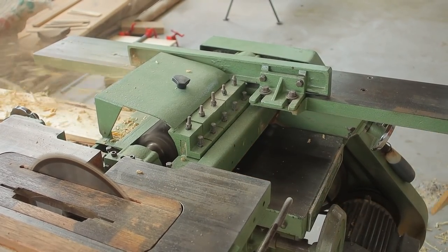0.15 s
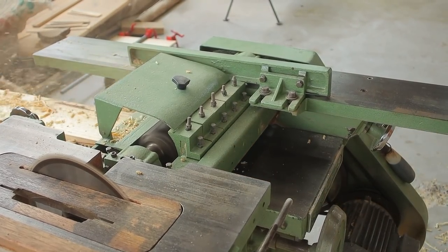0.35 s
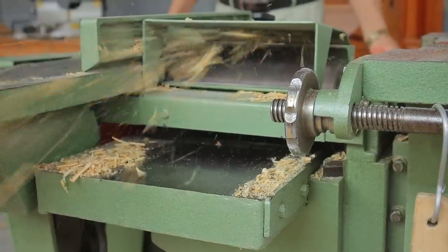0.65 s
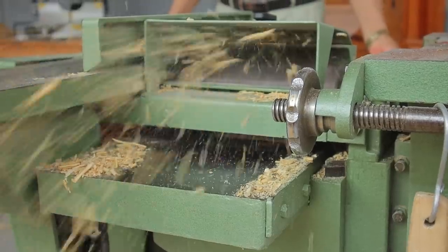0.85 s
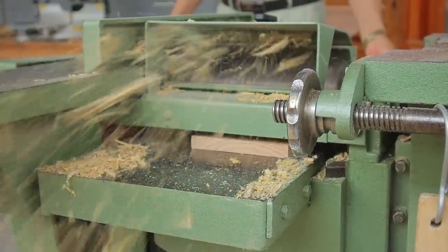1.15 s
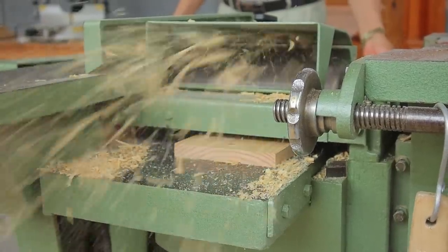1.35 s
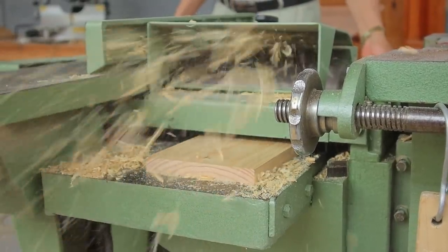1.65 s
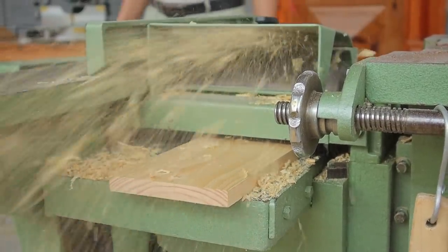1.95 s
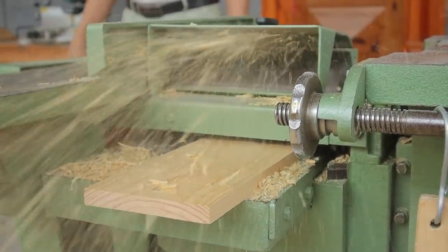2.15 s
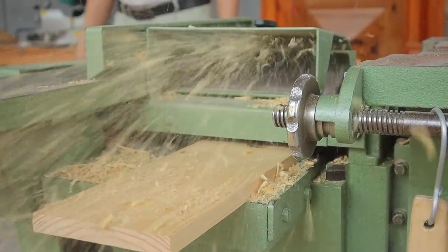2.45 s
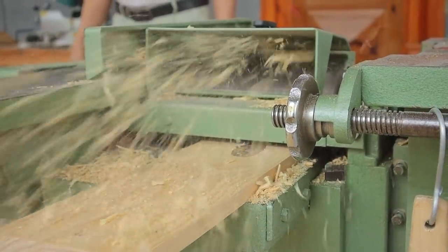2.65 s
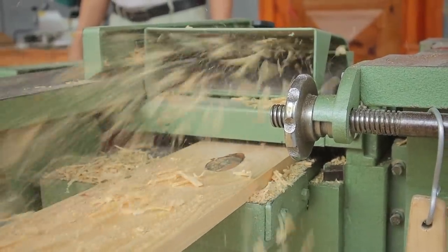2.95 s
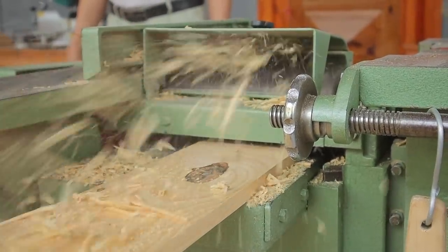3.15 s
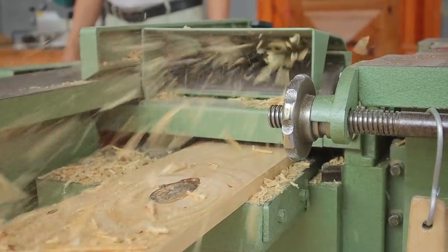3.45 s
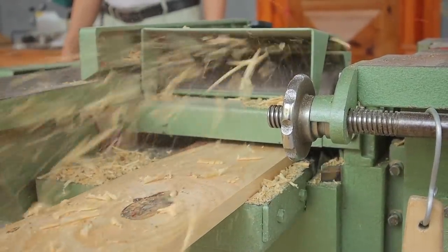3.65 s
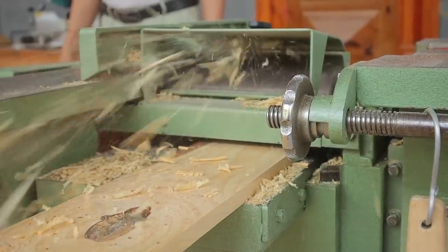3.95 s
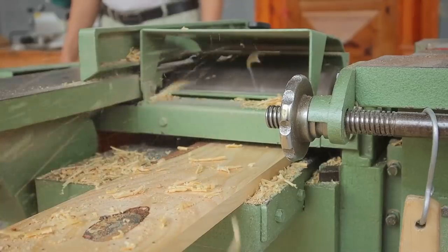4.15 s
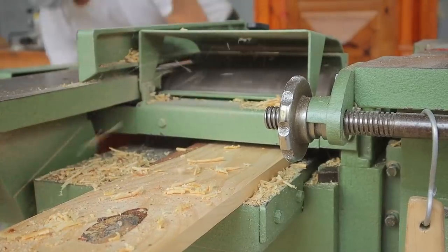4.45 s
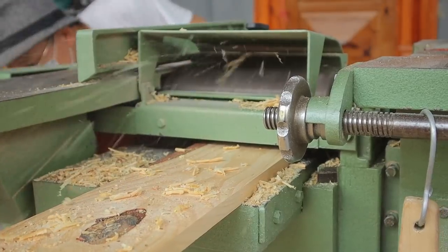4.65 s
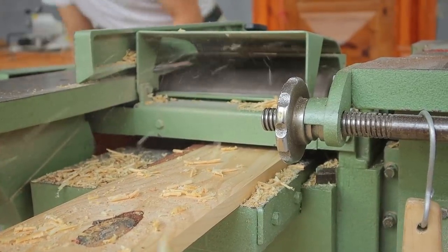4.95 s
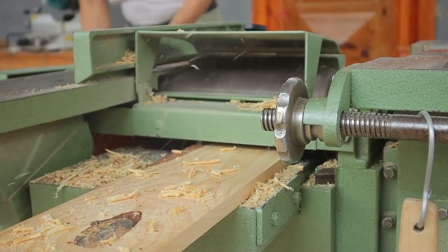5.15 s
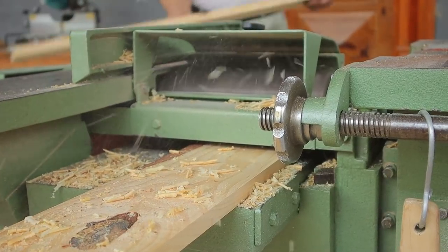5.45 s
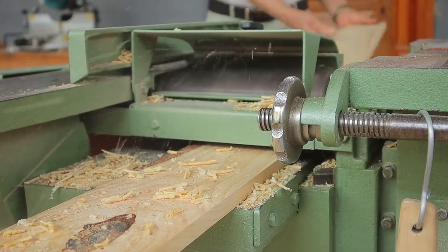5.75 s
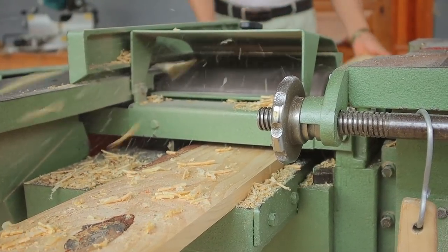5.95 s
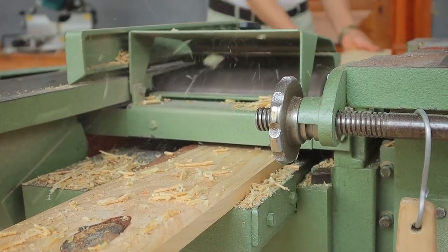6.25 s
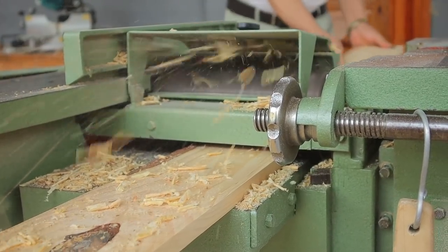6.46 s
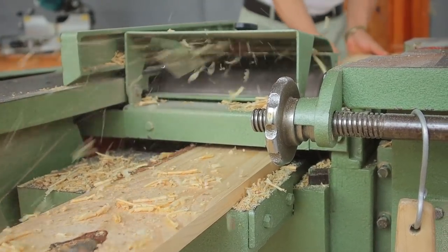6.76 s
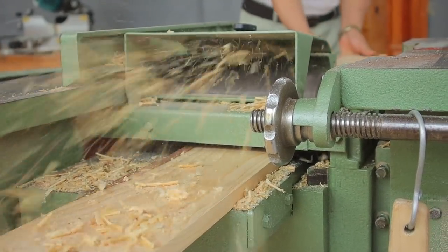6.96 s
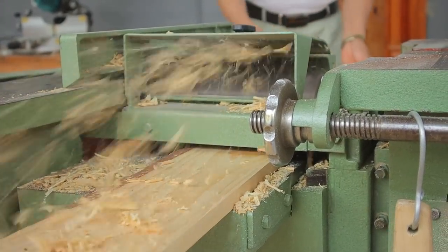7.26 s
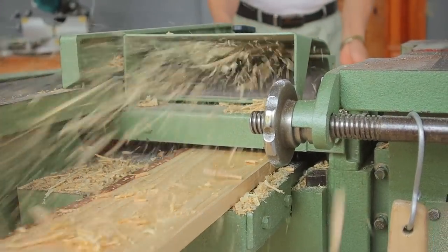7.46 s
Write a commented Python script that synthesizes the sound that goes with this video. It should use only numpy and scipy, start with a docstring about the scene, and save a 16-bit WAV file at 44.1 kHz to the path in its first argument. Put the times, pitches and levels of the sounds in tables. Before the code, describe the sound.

Close in a woodworking shop, a planer's spinning knife block whines thinly, drops out for an instant, then returns nearer, idling briefly. A board bites in with a harsh, loud, ringing buzz, crackling splinters and chips ticking on the metal hood. The board stalls and the sound settles into a steadier metallic drone, until sharp knocks announce another board and the rough tearing resumes to the end.

```python
"""A planer's two-knife cutter block, heard close by in a woodworking shop: first skimming a board at the
top table, then, from the outfeed, idling briefly and biting into a board fed through underneath. That board
stalls, its tail brushing the knives, until a second board pushes it on. Each knife stroke is a ringing knock
and a burst of tearing fibre; splinters crack, boards bump, the block hums and rushes, chips tick in the hood
and patter around. The speed curve sets every stroke; its sag under load also steers hiss, hum and chips."""
import sys
import numpy as np
from scipy import signal
from scipy.fft import rfft, irfft, next_fast_len
from scipy.io import wavfile
from scipy.ndimage import uniform_filter1d, map_coordinates

SR = 44100
rng = np.random.default_rng(int(sys.argv[2]) if len(sys.argv) > 2 else 0)


def dump_mix(stems):
    """Bounce the given channels to the path in sys.argv[1] as a 16-bit WAV at rate SR."""
    frames = np.atleast_2d(stems).T  # one column per channel
    limited = np.clip(frames, -1, 1)  # hard clip at full scale
    pcm = np.round(limited * 32767).astype(np.int16)
    wavfile.write(sys.argv[1], SR, pcm)


N = 335601
TIME = np.arange(N) / SR

# cutter block speed, heard at the top table, then at the outfeed: (time [s], speed [turns/s])
TOP_SPEED = [(0.0, 149.9), (0.22, 152.1), (0.41, 154.5)]
FEED_SPEED = [(0.433, 157.1), (0.61, 156.7), (0.671, 153.4), (0.741, 151), (1.03, 149.9), (1.43, 148.1),
              (1.548, 148.9), (1.681, 147.6), (1.83, 145.7), (2.088, 148), (2.36, 147.6), (2.551, 148.7),
              (2.8, 150.5), (3.5, 151.1), (3.919, 151.1), (3.99, 152.4), (4.11, 154.9), (4.42, 156),
              (5.5, 155.1), (6.43, 155.6), (6.48, 153), (6.571, 152.9), (6.62, 154.3), (6.779, 154.8),
              (6.9, 150.5), (6.99, 150.3), (7.07, 153.1), (7.169, 151.6), (7.27, 150.8), (7.49, 152.4)]
# force of the cut in each stage, before changes of grip and rocking:
# (time [s], knock of the board [dB], bite of the edge [dB])
TOP_CUT = [(0.0, -33, -36), (0.21, -37, -33.5), (0.225, -36.5, -40.5), (0.41, -37.5, -37)]
ENTRY = [(0.621, -29.5, -18.5), (0.665, -25, -21.5), (0.9, -28, -32.5), (1.02, -28, -28.5),
         (1.05, -26.5, -27.5), (1.22, -26.5, -26.5), (1.42, -26.5, -30.5), (1.65, -21, -28),
         (1.8, -20, -24.5), (2.0, -28, -30.5)]
THROUGH = [(2.0, -35, -32), (2.04, -27.5, -31), (2.76, -31.5, -31.5), (3.23, -30, -29), (3.56, -33.5, -30),
           (3.75, -33.5, -26.5), (4.0, -29, -31.5)]
STALL = [(4.0, -30, -33), (4.401, -27, -31), (4.55, -27.5, -32), (4.95, -28, -30.5), (5.5, -27.5, -30),
         (6.15, -27.5, -31), (6.441, -28, -31.5)]
PUSH = [(6.44, -26.5, -29), (6.77, -28.5, -33.5), (6.83, -26.5, -27), (6.9, -24, -28), (7.0, -28, -24.5),
        (7.02, -29, -34), (7.08, -29.5, -33)]
NEXT_BOARD = [(7.081, -33, -26), (7.1, -30, -25), (7.15, -30, -26), (7.34, -30.5, -23.5),
              (7.42, -30, -33.5), (7.52, -33, -36.5), (7.564, -31.5, -30.5), (7.61, -34, -32)]
# harmonics that the board favours in each position: (multiple of the speed [1], relative level [dB])
TOP_ORDERS = [(3, -27), (4, -15.5), (5, -11.5), (6, 3.5), (7, -8), (8, -9), (9, -11), (10, -7.5), (11, -12),
              (12, -11)]
ENTRY_ORDERS = [(3, -28), (4, -23.5), (5, -27), (6, -12), (7, -13.5), (8, -5), (9, -14.5), (10, -1.5),
                (11, -8.0), (12, -0.5), (13, -11.5), (14, -6), (15, -12), (16, -7.5), (17, -12), (18, -4.5),
                (19, -5.5), (20, -6.5), (21, -9), (22, -7), (23, -14.5)]
THROUGH_ORDERS = [(3, -17.5), (4, -18), (5, -13), (6, -9), (7, -1), (8, -10.5), (9, -8), (10, -3), (11, -3),
                  (12, 0.0), (13, -7), (14, -1), (15, -1), (16, -4), (17, -5.5), (18, -3), (19, -6.5),
                  (20, -3), (21, -3.5), (22, -1), (23, -9.0)]
STALL_ORDERS = [(3, -24.5), (4, -26), (5, -9.5), (6, -1), (7, -1.5), (8, -14.5), (9, -14), (10, -1),
                (11, -3.5), (12, 2), (13, -8), (14, -5), (15, -5.5), (16, -2.5), (17, -0.5), (18, -19),
                (19, -20.5), (20, -6.5), (21, -9), (22, -11), (23, -16), (24, -12.5), (25, -20), (26, -6.5),
                (27, -15.5), (28, -4), (29, -8.5), (30, -15), (31, -19), (32, -3.5), (33, -11), (34, -13.5),
                (35, -12.5), (36, -15), (37, -20), (38, -17.5), (39, -13.5), (40, -20), (41, -10),
                (42, -26), (43, -22), (44, -16), (45, -24), (46, -32), (47, -17), (48, -35.5), (49, -17.0)]
PUSH_ORDERS = [(3, -22.5), (4, -17), (5, -13), (6, -6), (7, -5.5), (8, -10.5), (9, -11), (10, -5), (11, -4),
               (12, -3), (13, -5), (14, -7), (15, -1), (16, -2.5), (17, 1), (18, -7)]
NEXT_ORDERS = [(3, -24), (4, -13), (5, -20), (6, -11), (7, -8.5), (8, -2.5), (9, -11.0), (10, -2.5),
               (11, -6), (12, 3.5), (13, -4.5), (14, -6.5), (15, -4.0), (16, 1)]
# overall colour of the strokes: (frequency [Hz], relative density [dB per Hz])
TOP_COLOUR = [(240, -87), (400, -51), (586, -11), (772, -6), (821, -27), (900, 5.5), (1130, -19), (1490, 1),
              (2590, -20.5), (3210, -20.5), (5560, -23), (15500, -56)]
ENTRY_COLOUR = [(240, -63), (400, -26), (586, -31), (784, -24), (873, -18), (1100, -13), (1150, -7),
                (1260, -9), (1470, -14), (1560, -9.5), (2400, -9), (4420, -17.5), (6000, -17),
                (15500, -41.5)]
THROUGH_COLOUR = [(240, -64), (400, -34), (445, -19), (503, -15.5), (586, -17), (972, 0), (1030, -2),
                  (1280, -3.5), (1470, -2), (2190, -4), (2550, -9.5), (3060, -7.5), (5910, -12.5),
                  (15500, -36)]
STALL_COLOUR = [(240, -60), (400, -47), (726, -9.5), (761, -18), (873, -19), (914, 0.5), (1000, -16),
                (1100, -6.5), (1470, -5.5), (1540, -4), (1850, -0.5), (2700, -5.5), (3600, -13.5),
                (5150, -17), (6500, -15), (8300, -26), (8700, -30.5), (10300, -32.5), (10800, -30),
                (11200, -39), (15500, -54)]
PUSH_COLOUR = [(240, -67), (400, -25), (705, -24), (761, -9), (847, -14), (900, -14), (987, -13),
               (1050, -4), (1420, -10), (1820, -7.5), (2120, -6.5), (5910, -14), (15500, -47)]
NEXT_COLOUR = [(240, -60), (400, -20), (605, -16), (705, -33), (772, -1), (847, -39), (886, 3), (987, -16),
               (1190, -3), (1280, -5), (1790, -5), (4500, -14), (6800, -17.5), (9000, -26), (15500, -39.5)]
# irregular part of the strokes, strongest in the treble: (frequency [Hz], relative level [dB])
SPLINTER_TILT = [(400, 6.5), (1000, -1), (2000, 0.5), (4000, 8), (8000, 10.5), (15000, 23)]
# stereo width at the microphones: (frequency [Hz], side against mid [dB])
TOP_WIDTH = [(60, -19), (150, -33), (380, -32), (950, -31), (2380, -8), (5980, -5), (15000, 8)]
CUT_WIDTH = [(60, -18), (110, -19), (200, -19), (380, -38), (700, -17), (1290, -43.5), (2380, -15),
             (4400, -9.5), (8120, -3), (15000, 3.5)]
STALL_WIDTH = [(60, -19), (110, -15), (200, -11), (380, -23), (700, -33), (1290, -30.5), (2380, -15.5),
               (4400, -8.5), (8120, 4), (15000, 8.5)]
PUSH_WIDTH = [(60, -24), (110, -17), (200, -11), (380, -33), (700, -16), (1290, -62), (2380, -14.5),
              (4400, -10.5), (8120, 4.5), (15000, 8)]
# chips landing all around: (frequency [Hz], side against mid [dB])
PATTER_WIDTH = [(60, -18), (110, -18), (200, -11), (300, -6), (800, -9)]
# air chopped at the table lips, before a board covers it: (multiple of the speed [1], level [dB rms])
SIREN = [(4, -43.5), (6, -45.5), (8, -59), (10, -44), (12, -48), (18, -62), (20, -57.5), (24, -61),
         (28, -78)]
# colour of windage and belt, of the patter and of the crackle: (frequency [Hz], relative density [dB per Hz])
AIR = [(35, -78), (60, -61), (305, -13), (559, -15), (627, -6), (705, -15.5), (931, -6), (1590, -11.5),
       (1700, -16), (4320, -5), (15500, -37.5)]
PATTER_COLOUR = [(20, -24), (50, -16), (90, -5), (160, -1.5), (240, -2.5), (400, -12), (800, -8.5),
                 (2000, -60)]
CRACKLE_COLOUR = [(300, -38), (900, -16), (2500, 3), (4200, -2.5), (6500, 0), (9000, -9), (15500, -23)]
# short cracks and low knocks: splinters, single knife strokes, boards bumping:
# (time [s], level [dB], centre [Hz], decay [s])
CRACKS_AND_KNOCKS = [(0.127, -29, 3190, .0028), (0.727, -24, 2870, .0015), (0.774, -30, 3017, .0015),
                     (2.554, -21, 4190, 0.0016), (2.841, -21, 4500, .0015), (3.888, -28, 4540, .002),
                     (3.955, -24, 3800, 0.0025), (4.287, -22, 2511, .0028), (4.733, -22, 1996, .0028),
                     (5.849, -37, 600, .008), (5.953, -6.5, 4300, 0.0014), (6.441, -13.5, 2100, 0.0013),
                     (6.444, -25.5, 950, 0.006), (7.081, -9, 3420, 0.0014), (7.094, -8, 4000, 0.0012),
                     (7.108, -22, 4000, 0.0014), (7.121, -16, 4010, 0.0014), (7.133, -15, 4000, 0.0013),
                     (7.338, -15, 3040, 0.0031), (7.345, -21, 3400, 0.0013), (7.352, -20, 4030, .0012)]
# passing resonances of board and table, width taken at half the lift:
# (strongest at [s], swell [s], fade [s], centre [Hz], width [Hz], nominal lift [dB])
RINGS = [(0.635, 0.017, 0.06, 3070, 604, 3.5), (0.68, 0.052, 0.15, 3100, 450, 8),
         (0.69, 0.055, 0.06, 5140, 170, 17), (0.9, 0.16, 0.1, 2495, 150, 21),
         (1.12, 0.11, 0.16, 2980, 200, 6), (1.13, 0.09, 0.12, 1500, 140, 0.5),
         (1.2, 0.24, 0.12, 3450, 600, 5.5), (1.36, 0.15, 0.12, 1770, 140, 0),
         (1.4, 0.2, 0.19, 1288, 140, 17), (1.51, 0.18, 0.2, 4100, 160, 12),
         (1.65, 0.078, 0.28, 2530, 240, 11), (1.67, 0.01, 0.44, 3820, 140, 11),
         (1.7, 0.38, 0.22, 1500, 140, 6.5), (1.83, 0.33, 0.17, 1200, 130, 7),
         (1.84, 0.28, 0.22, 2380, 140, 15.5), (1.95, 0.28, 0.063, 3250, 140, 15),
         (2.1, 0.18, 0.22, 1520, 140, 12.5), (2.23, 0.13, 0.11, 4730, 180, 20),
         (2.32, 0.44, 0.26, 2590, 190, 11), (2.36, 0.85, 0.1, 5880, 139, 18.5),
         (2.4, 0.39, 0.067, 1770, 140, 9.5), (2.47, 0.8, 0.13, 3470, 150, 16),
         (2.48, 0.14, 0.47, 1220, 140.6, 13.5), (2.77, 0.11, 0.25, 3860, 170, 9),
         (2.86, 0.11, 0.12, 6700, 140, 20), (2.86, 0.64, 0.67, 5990, 140, 12),
         (2.9, 0.3, 0.48, 1718, 140, 13), (3.0, 0.06, 0.31, 4590, 140, 15.0),
         (3.2, 0.41, 0.089, 3090, 160, 8), (3.25, 0.29, 0.18, 2270, 490, 7.5),
         (3.26, 0.065, 0.095, 1210, 380, 13), (3.36, 0.29, 0.2, 5430, 140, 7),
         (3.54, 0.32, 0.3, 1350, 140, 7), (3.73, 0.098, 0.27, 4420, 240, 7.5),
         (3.86, 0.093, 0.4, 4680, 210, 7), (3.88, 0.23, 0.11, 2840, 220, 6.5),
         (4.14, 0.15, 0.62, 2360, 480, 7), (4.49, 0.17, 0.68, 2040, 140, 8.5),
         (4.63, 0.27, 0.31, 2524, 140, 6.5), (4.68, 0.9, 0.35, 2880, 170, 15),
         (4.87, 0.76, 0.11, 1330, 230, 9.5), (5.31, 0.09, 0.43, 3360, 139.4, 14),
         (5.56, 0.86, 0.11, 3953, 140, 13), (6.1, 0.8, 0.76, 2970, 240, 10),
         (6.7, 0.35, 0.2, 1866, 150, 4.5), (6.72, 0.16, 0.13, 2520, 400, 6.5),
         (6.88, 0.079, 0.08, 1766, 160, 11), (6.89, 0.67, 0.35, 3380, 160, 9),
         (6.92, 0.087, 0.06, 1340, 150, 14), (6.96, 0.054, 0.05, 4770, 250, 7),
         (6.97, 0.18, 0.044, 2380, 450, 8), (7.085, 0.012, 0.059, 880, 250, 14),
         (7.09, 0.022, 0.14, 4610, 190, 19.5), (7.14, 0.031, 0.06, 3000, 300, 8),
         (7.17, 0.073, 0.1, 4470, 150, 8), (7.17, 0.28, 0.05, 3080, 340, 4.5),
         (7.19, 0.046, 0.24, 3700, 140, 17), (7.26, 0.08, 0.071, 2640, 300, 3),
         (7.34, 0.04, 0.4, 3050, 150, 8), (7.345, 0.03, 0.04, 3200, 400, 8),
         (7.36, 0.05, 0.9, 3340, 150, 9.0)]
# brief changes in the knives' grip, the knock dips, the bite dips or rises:
# (time [s], half length [s], change of knock [dB], change of bite [dB])
GRIP_CHANGES = [(1.025, 0.0089, -9, 1), (4.387, 0.073, -3.5, -4.5), (4.799, 0.036, -4.5, -3),
                (7.051, 0.023, -0.5, 3.5)]
# the wood splinters instead of cutting clean: (start [s], end [s], rise of the irregular part [dB])
TEAR_OUTS = [(0.103, 0.25, 5), (0.635, 0.856, 6), (2.05, 2.587, 6.5), (3.22, 3.323, 4), (3.897, 4.058, 5),
             (6.437, 6.59, 3), (6.802, 6.917, 1), (7.085, 7.153, 9.5)]
# showers of chips landing close by: (start [s], length [s], level before the common lift [dB])
SHOWERS = [(0.683, 0.046, -55), (0.78, 0.034, -57), (1.16, 0.041, -53), (3.014, 0.085, -55.5),
           (3.235, 0.032, -58), (3.353, 0.034, -57), (3.403, 0.071, -60), (3.854, 0.096, -59),
           (3.966, 0.062, -54.5), (4.14, 0.069, -57), (4.236, 0.031, -60), (4.946, 0.055, -55),
           (5.024, 0.06, -60), (5.27, 0.035, -58), (5.39, 0.034, -58), (5.54, 0.056, -57),
           (5.647, 0.65, -55), (6.583, 0.049, -57), (6.66, 0.085, -54), (6.933, 0.039, -55),
           (7.295, 0.034, -55), (7.439, 0.083, -55)]
# splinters breaking ahead of the knife:
# (start [s], end [s], middle level [dB], fewest turns between breaks [1], most turns [1])
CRACKLES = [(0.628, 0.8, -34, 1, 3), (1.001, 2.045, -27, 1, 3), (2.048, 2.6, -22, 1, 3),
            (2.601, 3.0, -21, 2, 3), (3, 3.602, -25.5, 2, 3), (3.602, 3.96, -22, 2, 3),
            (6.446, 6.62, -32, 1, 3), (6.79, 7.007, -20.5, 1, 2), (7.141, 7.187, -19, 2, 2),
            (7.187, 7.358, -27, 1, 1)]

MOVE_S = 0.42  # the listener moves from the top table to the outfeed
EDGE_HZ = 15900  # upper limit of the band
FRAMES_PER_S = 100  # pace of all slow random drifts
IDLE_HZ, FULL_SAG_HZ = 154.3, 9.6  # turns/s with no load, and what a full cut takes off
AIR_DB = -44  # rush of windage and belt
# knife-passing tone: idling level, change in a full cut, change at the top table, wavering
HUM_DB, HUM_LOAD_DB, HUM_TOP_DB, HUM_WAVER_DB = -48.5, -5, -4, 0.35
SIREN_WAVER_DB = -1  # scaled by load: chopped air wavers more while wood moves over the gap
# patter between showers, before and after the stream of chips swings near
DRAUGHT_DB, STREAM_DB, STREAM_S = -68, -64, 3.1
SHOWER_FADE_S, SHOWER_LIFT_DB = 0.011, 3
TEAR_FADE_S = 0.027
USUAL_BITE_DB = -29.5  # the hiss of tearing fibre follows the bite around this level
HISS_LOAD_DB = 4.5  # extra hiss in a full cut
ROCK_S, ROCK_DB, ROCK_LOW_S = 0.1979, 0.6, 6.5  # rocking of the stalled board: period, depth, a low point
GRAIN_DB = 3.2  # patchiness of the upper resonances, before scaling by drift and frequency
RING_NOISE_SHARE = 0.2  # part of a resonance's lift that the tearing fibre gets


def gain_of(db):
    """Decibels to amplitude."""
    return 10 ** (np.asarray(db) / 20)


def evened(x):
    """Scales to rms 1."""
    return x / np.sqrt(np.mean(x ** 2) + 1e-20)


def steady(x):
    """Scales to a running rms of 1, leaving single strokes their differences."""
    power = uniform_filter1d(uniform_filter1d(x ** 2, size=2900), size=2000)
    return x / np.sqrt(abs(power) + 1e-20)


def spectrum_at(points, hz):
    """Reads a spectrum table on a log-frequency axis."""
    f, value = np.transpose(points)
    return np.interp(np.log(hz + 1), np.log(f + 1), value)


def curve_at(rows, t, axis=1):
    """Reads one column of a time curve at times t."""
    rows = np.asarray(rows)
    return np.interp(t, rows[:, 0], rows[:, axis])


def during(t, start, end, fade_s):
    """1 between start and end, with a ramp of twice fade_s centred on each."""
    return np.clip(np.minimum(t - start, end - t) / (2 * fade_s) + .5, 0, 1)


def shaped(x, gain):
    """Filters x by a gain that is a function of frequency."""
    size = next_fast_len(x.shape[-1] + 2048)
    return irfft(rfft(x, size) * gain(np.fft.rfftfreq(size, 1 / SR)), size)[..., :x.shape[-1]]


def drifting(shape, frames, axis):
    """Unit noise that changes smoothly over so many frames along one axis."""
    size = shape[axis] + 256
    noise = rng.standard_normal(shape[:axis] + (size,) + shape[axis + 1:])
    noise = np.moveaxis(noise, axis, -1)
    smooth = irfft(rfft(noise) * np.exp(-(np.fft.rfftfreq(size) * frames * 2) ** 2), size)
    return evened(np.moveaxis(smooth[..., :shape[axis]], -1, axis))


def wavering(frames):
    """A slow random wander of rms 1 over the whole scene."""
    return np.interp(TIME * FRAMES_PER_S, np.arange(800), drifting((800,), frames, axis=0))


def stereo(pair, width):
    """Two unrelated sounds become mid and side, the side weighted by a width table."""
    side = shaped(pair[1], lambda hz: gain_of(spectrum_at(width, hz)))
    return np.array([pair[0] + side, pair[0] - side])


def add(mix, s, sound):
    """Mixes a stereo sound in at a time."""
    part = mix[:, round(s * SR):][:, :sound.shape[1]]
    part += sound[:, :part.shape[1]]


def speed_at(t):
    """Turns of the cutter block per second."""
    return curve_at(np.vstack([TOP_SPEED, FEED_SPEED]), t)


def load_at(t):
    """The loss of speed tells the load: 0 idling, 1 in a full cut."""
    return np.maximum(IDLE_HZ - speed_at(t), 0) / FULL_SAG_HZ


def patter(per_s=110, spread_db=3.0, draught=0.056, far_db=-4, gust_db=3):
    """Flying chips land as soft thuds in the gusty draught from the hood, now and then in a shower."""
    landings = (rng.random((2, N)) < per_s / SR) * rng.choice([-1, 1], (2, N))
    thuds = landings * gain_of(spread_db * rng.standard_normal((2, N)))
    rustle = thuds + draught * rng.standard_normal((2, N))
    low = shaped(rustle, lambda hz: gain_of(spectrum_at(PATTER_COLOUR, hz)))
    stream_db = STREAM_DB + gust_db * wavering(5)
    between_db = np.where(TIME < STREAM_S, DRAUGHT_DB, stream_db) + far_db * (TIME < MOVE_S)
    showers = sum(gain_of(db + SHOWER_LIFT_DB) * during(TIME, s, s + length, SHOWER_FADE_S)
                  for s, length, db in SHOWERS)
    return stereo(evened(low) * np.hypot(gain_of(between_db), showers), PATTER_WIDTH)


def imbalance(turns, level_db=-66):
    """At the top table the slightly unbalanced block drones once a turn."""
    return np.sqrt(2) * gain_of(level_db) * np.sin(2 * np.pi * turns) * (TIME < MOVE_S)


def windage(turns, load):
    """The spinning block chops the air twice a turn: a hum, its overtones and a pulsing rush."""
    ears = 0.0081 * np.array([[1], [-1]])  # [rad] the hum reaches the two sides slightly out of step
    hum_db = HUM_DB + HUM_LOAD_DB * load + HUM_TOP_DB * (TIME < MOVE_S) + HUM_WAVER_DB * wavering(8)
    hum = gain_of(hum_db) * np.sin(4 * np.pi * turns + ears + 0.054 * wavering(8))
    siren = 0
    for order, db in SIREN:
        tone_db = db + SIREN_WAVER_DB * (0.03 + 1.6 * load) * wavering(8)
        siren = siren + gain_of(tone_db) * np.sin(2 * np.pi * (order * turns + rng.random()))
    # a board over the gap muffles the overtones
    covered_db = np.interp(TIME, [.41, .43, .62, .8], [-24, -2.5, -1.5, -11.5])
    rush = rng.standard_normal((2, N)) * (1 + .4 * np.cos(4 * np.pi * turns))
    rush = evened(shaped(rush, lambda hz: gain_of(spectrum_at(AIR, hz))))
    tones = np.sqrt(2) * (hum + siren * gain_of(covered_db))
    return tones + gain_of(AIR_DB) * stereo(rush, CUT_WIDTH)


def chips(load, top_share=.2, per_s=90, level_db=-27, spread_db=3, decay_s=0.0032):
    """Hard chips tick against the hood while wood is being cut: six kinds of short noise burst."""
    flow = np.minimum(load, 1) ** 2 * np.where(TIME < MOVE_S, top_share, 1)
    strength = np.minimum(rng.exponential(1, (2, N)), 3)
    hits = (rng.random((2, N)) < flow * per_s / SR) * gain_of(level_db + spread_db * strength)
    t, kind = np.arange(512) / SR, rng.integers(0, 6, N)
    ticks = np.zeros((2, N))
    for k in range(6):
        tick = rng.standard_normal((2, len(t))) * np.exp(-t / decay_s)
        ticks += signal.oaconvolve(hits * (kind == k), tick, axes=1)[:, :N]
    ticks = shaped(ticks, lambda hz: .5 * hz / np.hypot(hz, 2500) / np.hypot(1, hz / 7000))
    return stereo(ticks, CUT_WIDTH)


def cracks_and_knocks(attack_s=0.00037, room_db=-24, room_s=0.05, octaves=0.83, top_hz=10000):
    """A short crack or knock of wood: band noise and its tail in the shop."""
    out, t = np.zeros((2, N)), np.arange(8192) / SR
    for s, db, centre_hz, decay_s in CRACKS_AND_KNOCKS:
        tail = gain_of(room_db) * np.exp(-t / room_s)
        envelope = (np.exp(-t / decay_s) + tail) * (1 - np.exp(-t / attack_s))
        noise = rng.standard_normal((2, len(t)))
        band = shaped(noise, lambda hz: np.exp(-.5 * (np.log2((hz + 1) / centre_hz) / octaves) ** 2))
        add(out, s, gain_of(db) * evened(band) * envelope)
    return stereo(shaped(out, lambda hz: 1 / np.hypot(1, (hz / top_hz) ** 3)), CUT_WIDTH)


def crackle(turns, spread_db=3.0, decay_s=0.00075, room_db=-26, room_s=0.015):
    """A splinter lifts over a few strokes of the proud knife, then breaks with a bright click."""
    out, t = np.zeros((2, N)), np.arange(2048) / SR
    envelope = np.exp(-t / decay_s) + gain_of(room_db) * np.exp(-t / room_s)
    for start, end, db, fewest, most in CRACKLES:
        wait, size = rng.random((160, 2)).T
        gaps = fewest + np.floor(wait * (most - fewest + 1))
        first_turn = np.ceil(np.interp(start, TIME, turns))
        breaks = np.interp(first_turn + np.cumsum(gaps) - gaps[0], turns, TIME)
        bursts = rng.standard_normal((len(size), 2, len(t)))
        for s, strength, burst in zip(breaks[breaks < end], size, bursts):
            add(out, s, gain_of(db + 2 * spread_db * (2 * strength - 1)) * burst * envelope)
    hz = np.fft.rfftfreq(len(t), 1 / SR)
    unit = np.sqrt(np.mean(gain_of(2 * spectrum_at(CRACKLE_COLOUR, hz))))  # the colour keeps the power
    bright = shaped(out, lambda hz: gain_of(spectrum_at(CRACKLE_COLOUR, hz)) / unit)
    return stereo(bright, CUT_WIDTH)


def splintering(t):
    """Rise in dB of the irregular part of the strokes where the wood tears out."""
    return sum(db * during(t, start, end, TEAR_FADE_S) for start, end, db in TEAR_OUTS)


def contact(stage, t):
    """Knock and bite in dB: the force of the cut, the changes of grip and the rocking of the stalled board."""
    grip = sum(np.outer([knock, bite], np.exp(-((t - s) / half_s) ** 2))
               for s, half_s, knock, bite in GRIP_CHANGES)
    rock = -ROCK_DB * np.cos(2 * np.pi * (t - ROCK_LOW_S) / ROCK_S)
    rock = rock * during(t, STALL[0][0], STALL[-1][0], 0.099)
    return curve_at(stage, t) + grip[0] + rock, curve_at(stage, t, axis=2) + grip[1] + rock


def singing(hz, t):
    """Lift in dB by the resonances as the wood travels: each swells and fades in an arch."""
    def arch(peak, rise, fall):
        return np.sin(np.pi / 2 * np.clip(1 - np.maximum((peak - t) / rise, (t - peak) / fall), 0, 1))
    return sum(db * np.exp2(-(2 * (hz - centre) / width) ** 2) * arch(peak, rise, fall)
               for peak, rise, fall, centre, width, db in RINGS)


def strokes(turns, second_db, attack, decay, room_db):
    """Envelope over a turn: the proud knife, its partner half a turn later; the shop fills the gaps."""
    def blow(phase):
        return np.exp(-phase / decay) * (1 - np.exp(-phase / attack))
    proud = blow(turns % 1) ** 2
    partner = gain_of(2 * second_db) * blow((turns + .5) % 1) ** 2
    return np.sqrt(proud + partner + gain_of(2 * room_db))


def struck(level):
    """Gives harmonic levels the minimum phase of a body that is struck and then rings out."""
    cepstrum = irfft(np.log(np.maximum(level, level.max() * gain_of(-50))))
    half = cepstrum.shape[-1] // 2
    return level * np.exp(1j * rfft(cepstrum * 2 * (np.arange(2 * half) < half)).imag)


def ringing(t, turns, envelope, orders, colour, drift_s, edge, edge_hz=5000, late=0.0765, size=1024):
    """The repeating part: each turn rings board and hood alike; the ring slowly changes as the board moves."""
    frame = (t - t[0]) * FRAMES_PER_S
    frames, drift = int(frame[-1]) + 2, FRAMES_PER_S * drift_s
    # harmonics of one turn, for mid and side and each frame
    lines = rfft(drifting((2, frames, size), drift, axis=1) * envelope(np.arange(size) / size))
    lines /= np.sqrt(np.mean(abs(lines) ** 2))
    order = np.arange(lines.shape[-1])
    hz = order * (turns[-1] - turns[0]) / (t[-1] - t[0])
    blow = edge * np.exp(-hz / edge_hz)  # the proud knife's own blow is the same at every turn, and central
    lines[0] = (lines[0] + blow) / np.hypot(1, blow)
    at = np.interp(np.arange(frames), frame, t)[:, None]
    lift = gain_of(singing(order * speed_at(at), at))
    # harmonics swell and fade more when the board moves faster; one caught by a resonance holds steady
    lines /= np.sqrt(abs(lines) ** 2 + .02 / drift_s ** 1.5 / lift ** 2)
    level = gain_of(spectrum_at(colour, hz)) * (hz > 380) * (hz < EDGE_HZ)
    k, db = np.transpose(orders)
    k = np.round(k).astype(int)
    level[k] = evened(gain_of(db)) * np.sqrt(np.mean(level[k] ** 2))
    # upper resonances of the board come and go with the grain
    patches = drifting((frames, len(hz)), drift, axis=0)
    patches = evened(uniform_filter1d(patches, size=2, axis=1))
    moving = min(.4 / drift_s, 1)
    grain_db = GRAIN_DB * moving * patches * np.minimum(hz / 4000, 1.5) / lift
    lines *= struck(level * lift * gain_of(grain_db))
    # the edge clicks first; the heavy low modes of board and hood answer a little later
    lag_turns = late * np.exp(-hz / 3500)
    cycles = irfft(lines * np.exp(-2j * np.pi * np.cumsum(lag_turns)))
    place = [frame, turns % 1 * size]
    return evened(np.array([map_coordinates(c, place, order=1, mode="grid-wrap") for c in cycles]))


def planing(all_turns, stage, orders, colour, width, second_db, attack, decay, room_db, drift_s,
            uneven_db, fray_db, splinter_db, hiss_db, hiss_slope, edge):
    """One stage of the work: a ringing knock and a burst of tearing fibre at every knife stroke."""
    # a new bite is sudden; a sliding board changes slowly
    handover_s = np.interp(TIME, [.7, 1.8, 4.3, 6.3], [.012, .16, .16, .016])
    blend = np.clip(np.minimum(TIME - stage[0][0], stage[-1][0] - TIME) / handover_s + .5, 0, 1)
    active = blend > 0
    t, turns = TIME[active], all_turns[active]

    # no two chips are alike, least of all where the wood splinters
    chip = np.clip(rng.standard_normal(int(2 * all_turns[-1]) + 1), -2, 2)[(2 * turns).astype(int)]
    chip_db = chip * uneven_db * gain_of(0.2 * (splinter_db + splintering(t)))
    ring = ringing(t, turns, lambda phase: strokes(phase, second_db, attack, decay, room_db),
                   orders, colour, drift_s, edge)
    ring = ring * gain_of(0.32 * chip_db)
    # the tearing fibre dies away a little more slowly than the knock
    tear = rng.standard_normal((2, len(t))) * strokes(turns, second_db, attack, 1.25 * decay, room_db + 5)
    tear = shaped(tear * gain_of(chip_db),
                  lambda hz: gain_of(spectrum_at(colour, hz)) / np.sqrt(1 + (520 / (hz + 1)) ** 8))
    tear = evened(tear)

    # the balance of ring and tear varies with frequency and time
    hz, at, (ring, tear) = signal.stft(np.array([ring, tear]), SR, nperseg=512)
    tilt_db = spectrum_at(SPLINTER_TILT, hz) + fray_db * np.minimum(hz / 7000, 1)
    splinter = gain_of(tilt_db[:, None] + splinter_db + splintering(at + t[0]))
    tear = tear * gain_of(RING_NOISE_SHARE * singing(hz[:, None], at + t[0]))
    both = (ring + splinter * tear) / np.hypot(1, splinter)
    cut = signal.istft(both, SR, nperseg=512)[1][:, :len(t)]

    # three bands with levels of their own: knock, bite, hiss
    knock = shaped(cut, lambda hz: 1 / (1 + (hz / 2200) ** 16))
    hiss = cut - shaped(cut, lambda hz: 1 / (1 + (hz / 4300) ** 16))
    bite = cut - knock - hiss
    knock_db, bite_db = contact(stage, t)
    fibre_db = hiss_db + hiss_slope * (bite_db - USUAL_BITE_DB) + HISS_LOAD_DB * load_at(t)
    cut = (steady(knock) * gain_of(knock_db) + steady(bite) * gain_of(bite_db)
           + steady(hiss) * gain_of(fibre_db))
    out = np.zeros((2, N))
    out[:, active] = stereo(cut, width)
    return out * np.sqrt(blend)


def scene():
    """All stages share the turning of one cutter block."""
    # attack and decay are in turns
    turns, load = np.cumsum(speed_at(TIME)) / SR, load_at(TIME)
    turns += -np.interp(NEXT_BOARD[0][0], TIME, turns) % 1  # the second board is met by the proud knife
    wood = planing(turns, TOP_CUT, TOP_ORDERS, TOP_COLOUR, TOP_WIDTH,
                   second_db=-0.5, attack=0.034, decay=0.14, room_db=-11.0, drift_s=0.27, uneven_db=2.5,
                   fray_db=-6.5, splinter_db=-10.0, hiss_db=-31.5, hiss_slope=1.0, edge=0.37)
    wood += planing(turns, ENTRY, ENTRY_ORDERS, ENTRY_COLOUR, CUT_WIDTH,
                    second_db=-3, attack=0.11, decay=0.18, room_db=-25, drift_s=0.35, uneven_db=3.0,
                    fray_db=-3.0, splinter_db=-14.0, hiss_db=-36, hiss_slope=0.46, edge=1.58)
    wood += planing(turns, THROUGH, THROUGH_ORDERS, THROUGH_COLOUR, CUT_WIDTH,
                    second_db=-9.5, attack=0.058, decay=0.22, room_db=-15.5, drift_s=0.4, uneven_db=3.0,
                    fray_db=0.0, splinter_db=-14.5, hiss_db=-36, hiss_slope=0.13, edge=0.92)
    wood += planing(turns, STALL, STALL_ORDERS, STALL_COLOUR, STALL_WIDTH,
                    second_db=-15.0, attack=0.1, decay=0.2, room_db=-18.5, drift_s=1.28, uneven_db=3.0,
                    fray_db=-3.5, splinter_db=-15.0, hiss_db=-30.0, hiss_slope=1.22, edge=0.76)
    wood += planing(turns, PUSH, PUSH_ORDERS, PUSH_COLOUR, PUSH_WIDTH,
                    second_db=-12.0, attack=0.02, decay=0.21, room_db=-16.0, drift_s=0.16, uneven_db=2.5,
                    fray_db=-9.5, splinter_db=-10.0, hiss_db=-32.5, hiss_slope=0.41, edge=0.75)
    wood += planing(turns, NEXT_BOARD, NEXT_ORDERS, NEXT_COLOUR, PUSH_WIDTH,
                    second_db=-5.5, attack=0.015, decay=0.11, room_db=-19.5, drift_s=0.19, uneven_db=2.5,
                    fray_db=-1.5, splinter_db=-14.0, hiss_db=-34.0, hiss_slope=0.74, edge=0.81)
    background = patter() + imbalance(turns) + windage(turns, load)
    return background + chips(load) + cracks_and_knocks() + crackle(turns) + wood


def record(dry):
    """The sound breaks off for an instant between the two listening places; then the band limit."""
    heard = np.interp(TIME, [.409, .410, .428, .429], [1, 0, 0, 1])
    low_pass = signal.firwin(511, EDGE_HZ, window=("kaiser", 9), fs=SR)
    return signal.oaconvolve(dry * heard, low_pass[None], "same")


dry = scene()
out = record(dry)
dump_mix(out)
```